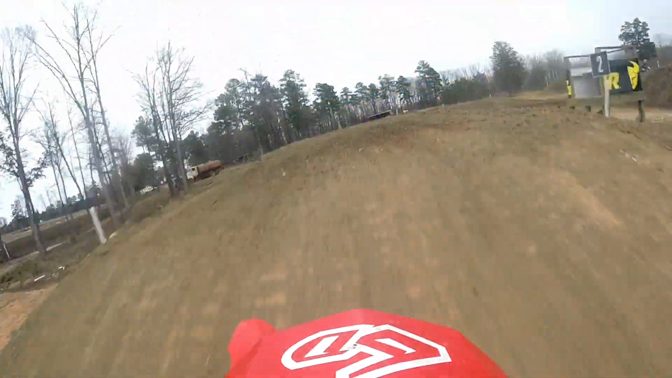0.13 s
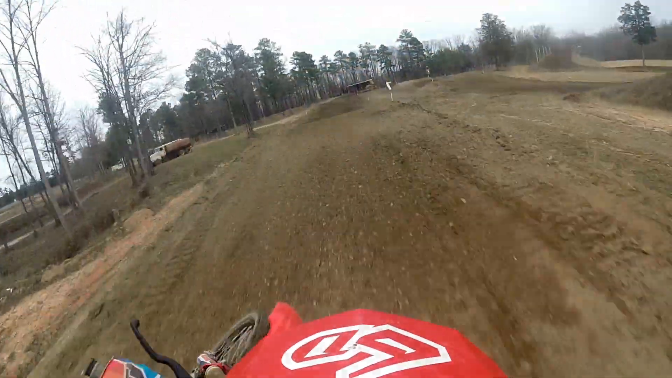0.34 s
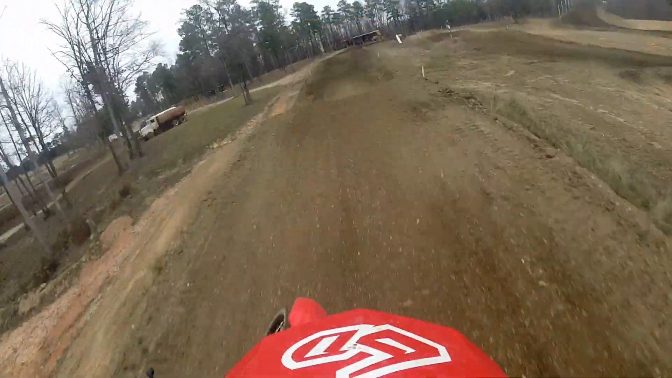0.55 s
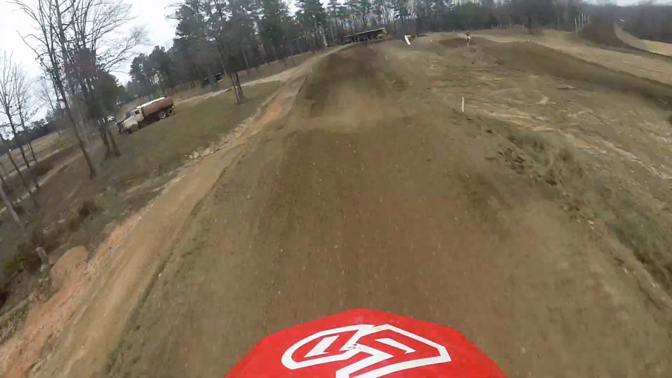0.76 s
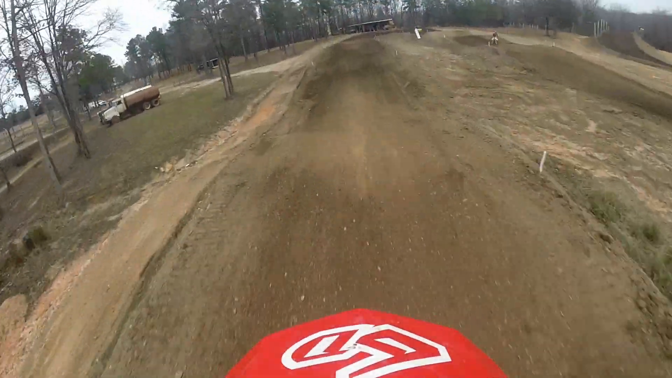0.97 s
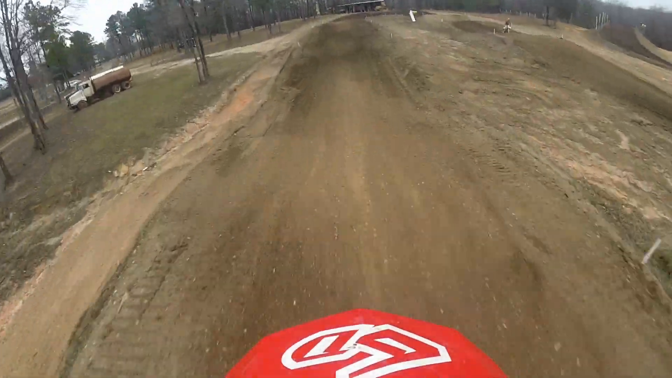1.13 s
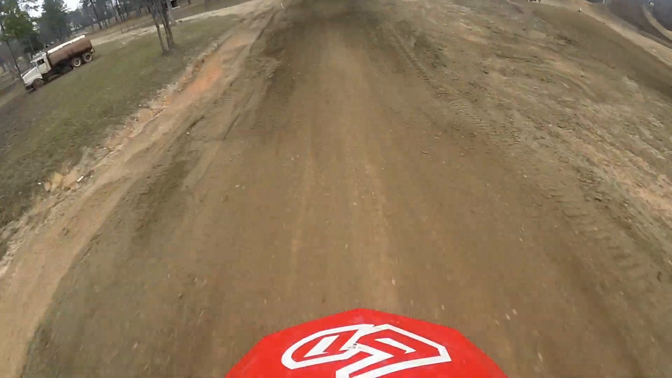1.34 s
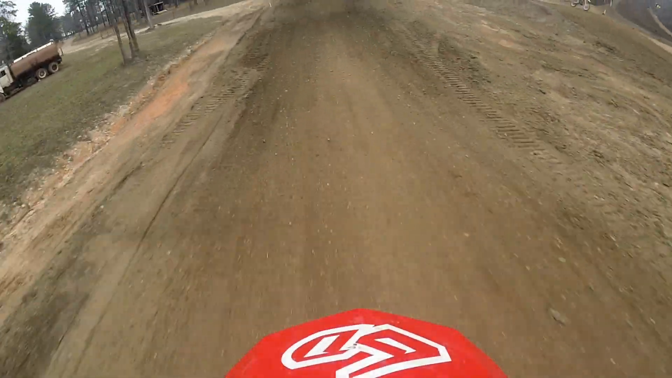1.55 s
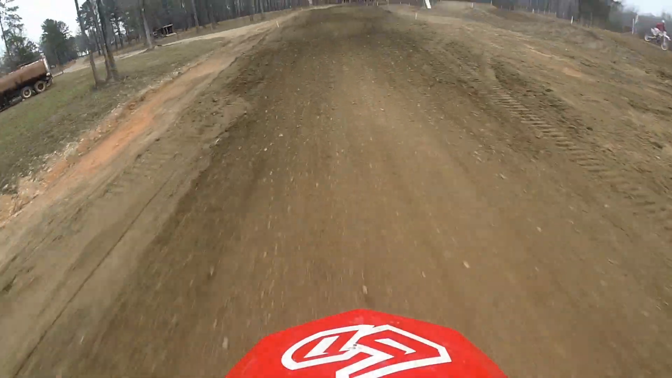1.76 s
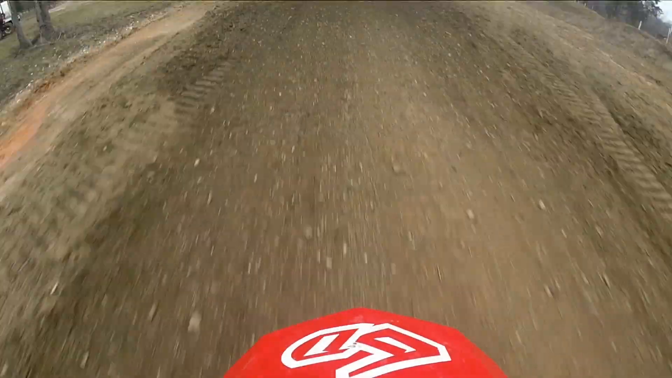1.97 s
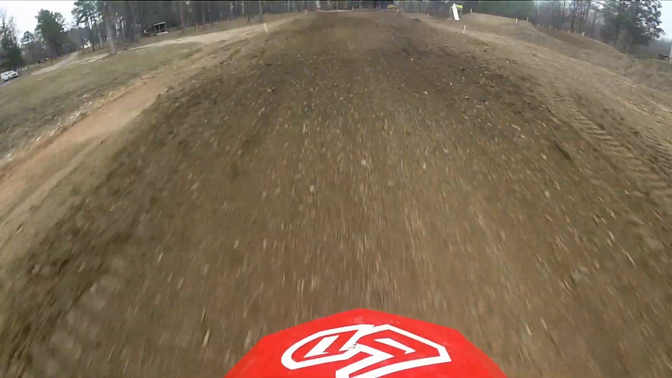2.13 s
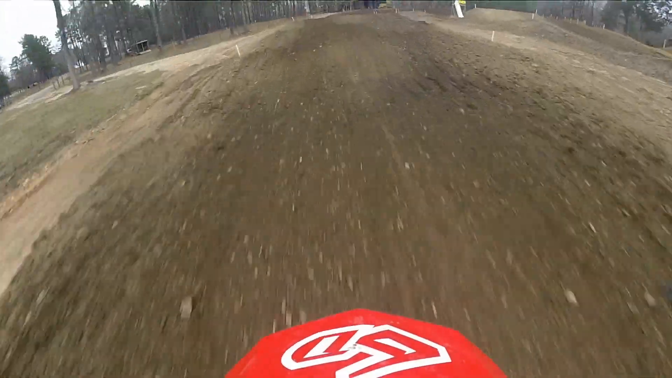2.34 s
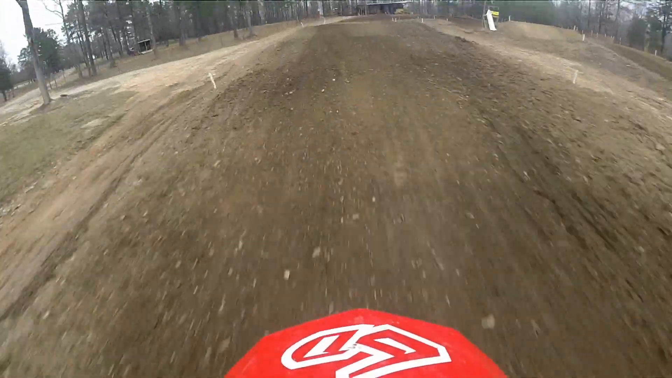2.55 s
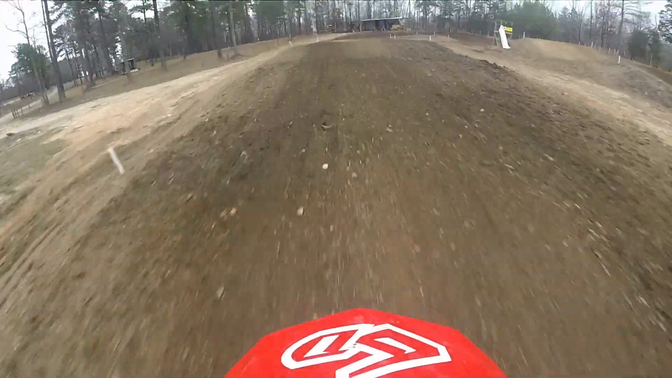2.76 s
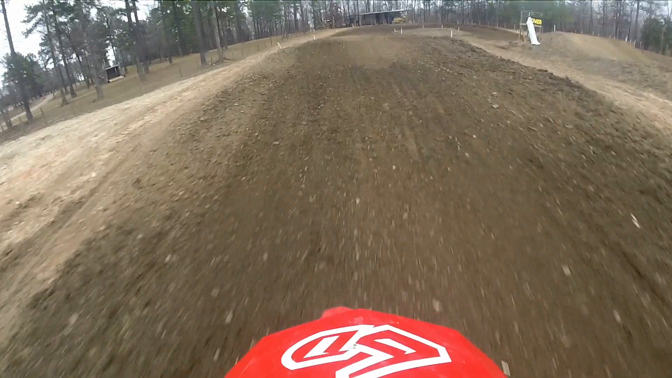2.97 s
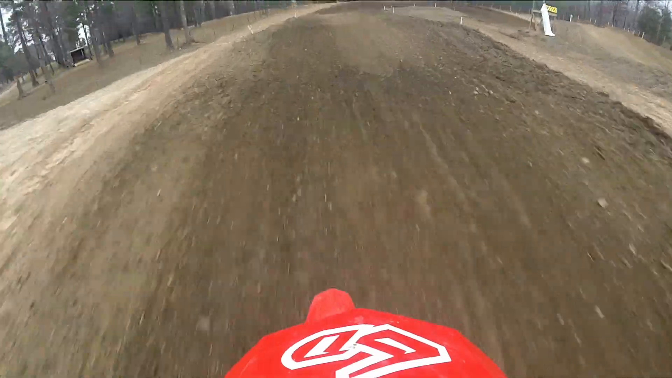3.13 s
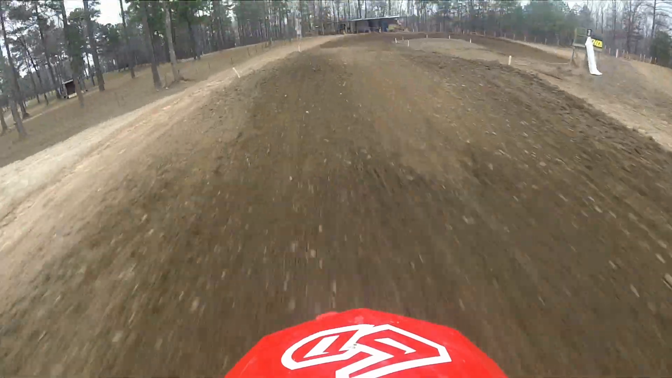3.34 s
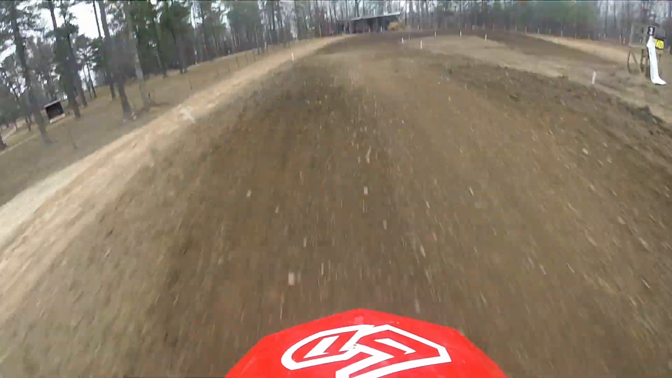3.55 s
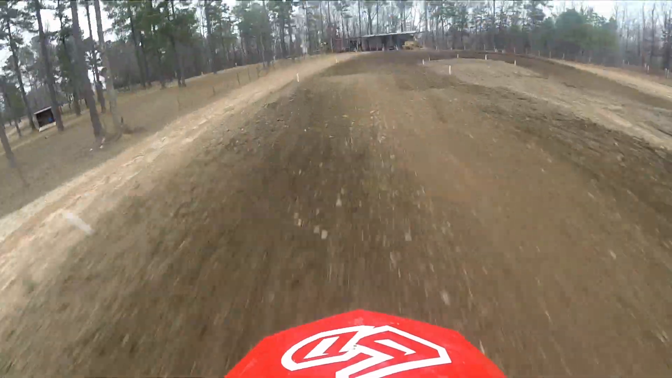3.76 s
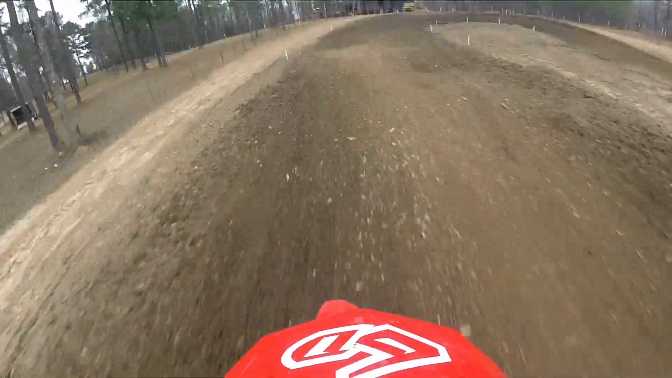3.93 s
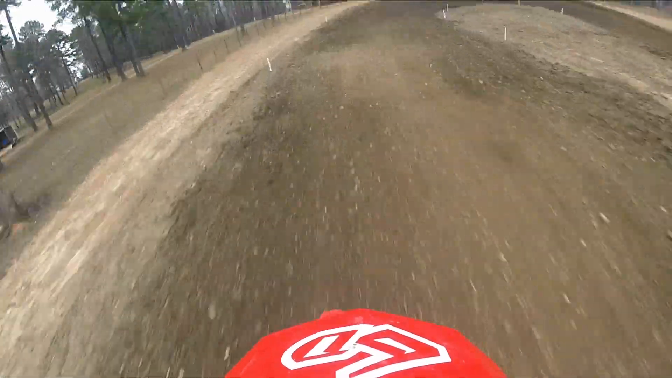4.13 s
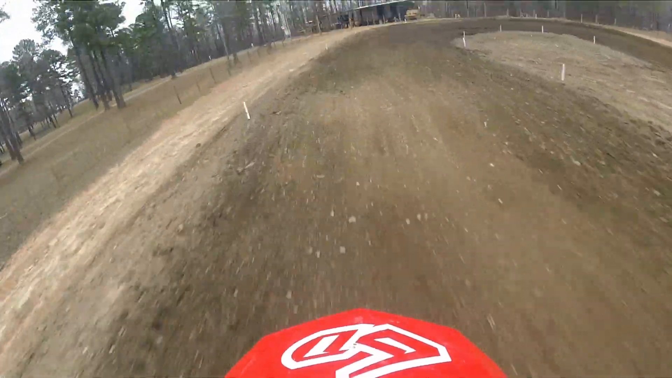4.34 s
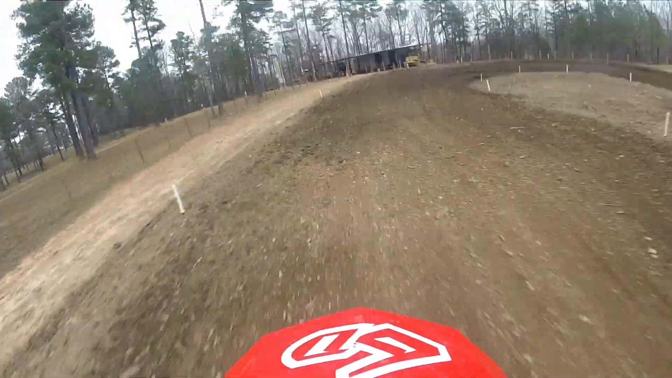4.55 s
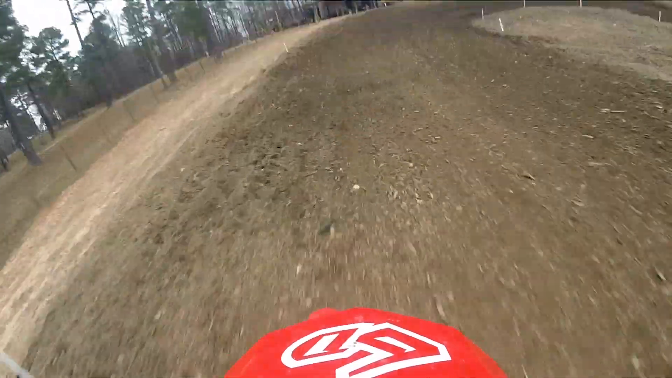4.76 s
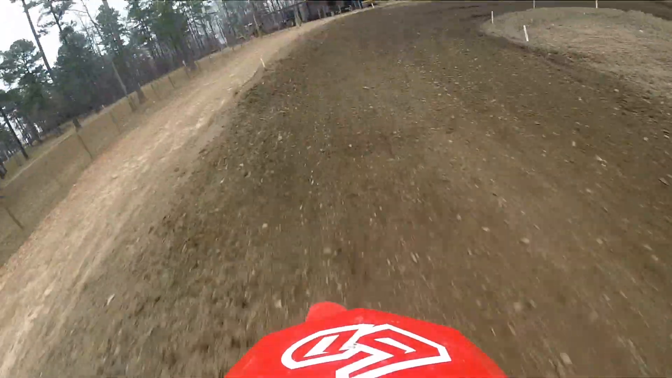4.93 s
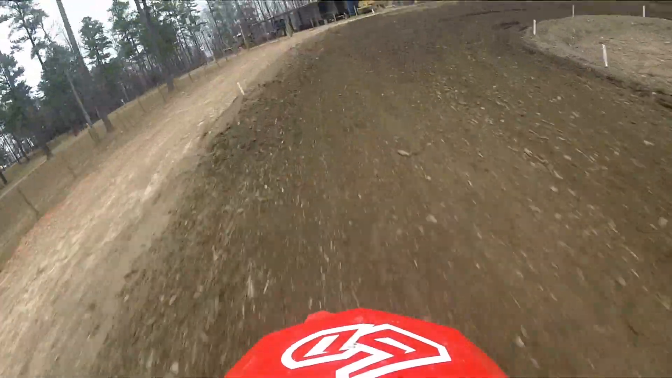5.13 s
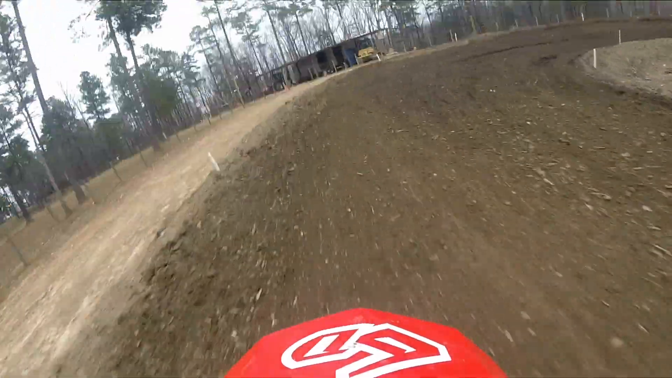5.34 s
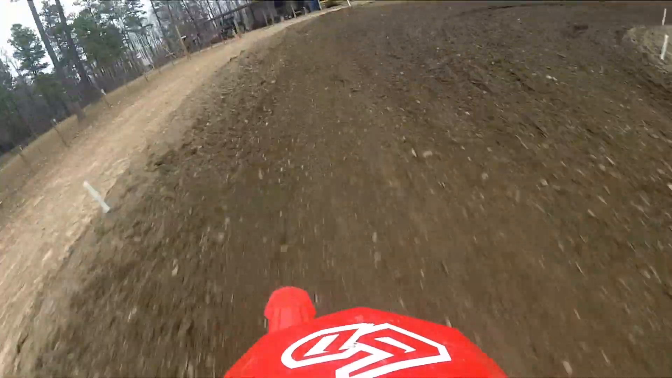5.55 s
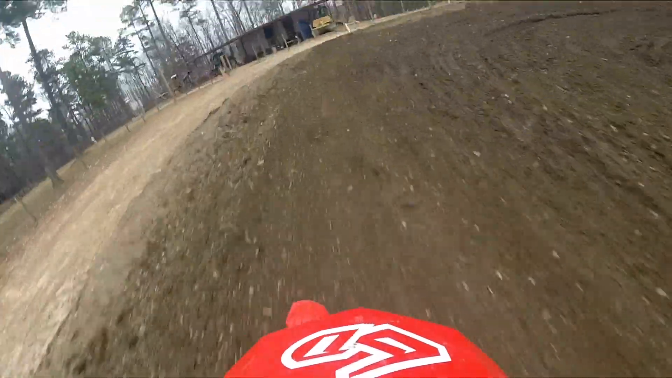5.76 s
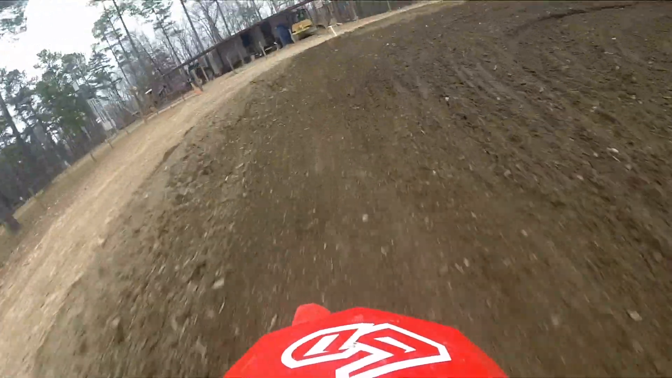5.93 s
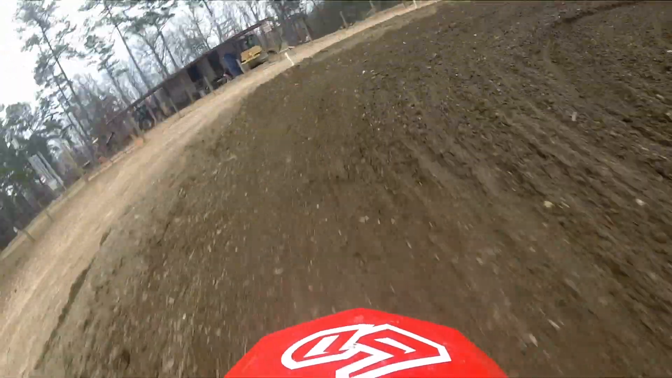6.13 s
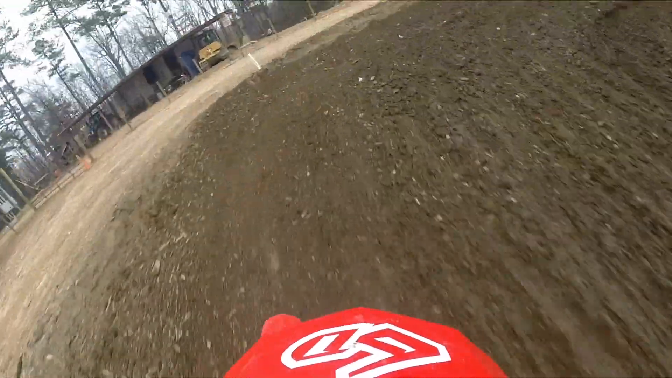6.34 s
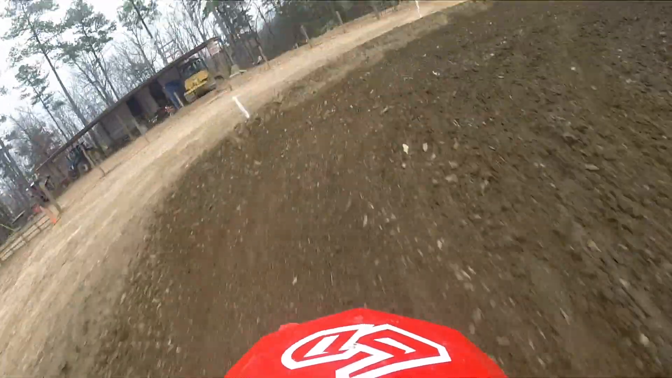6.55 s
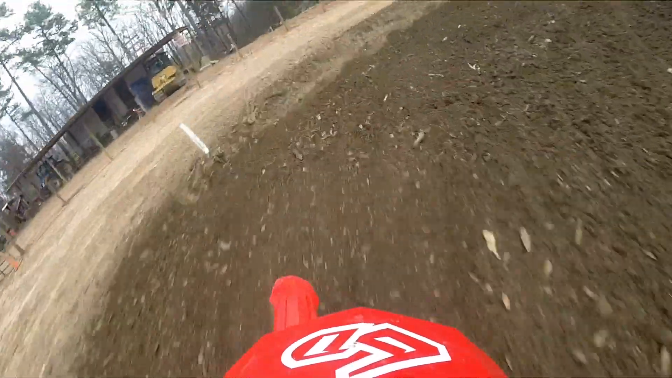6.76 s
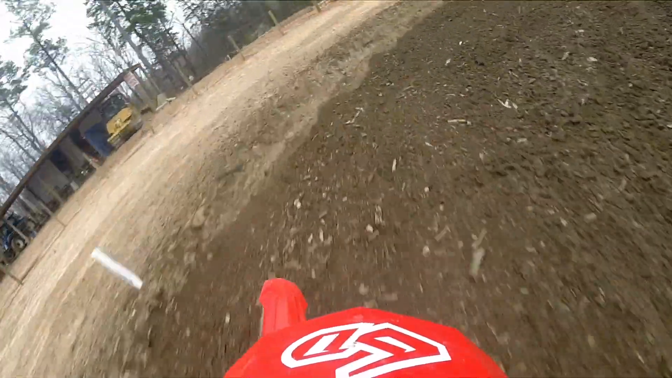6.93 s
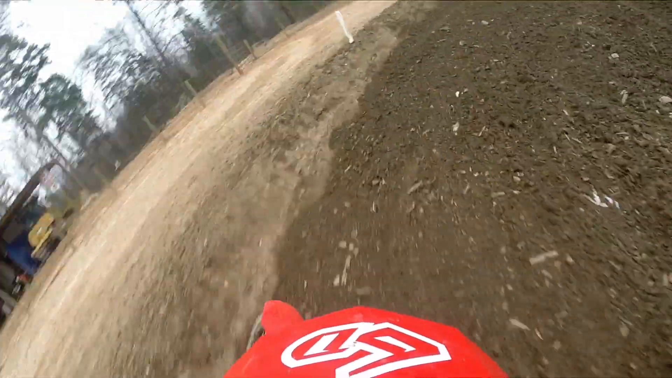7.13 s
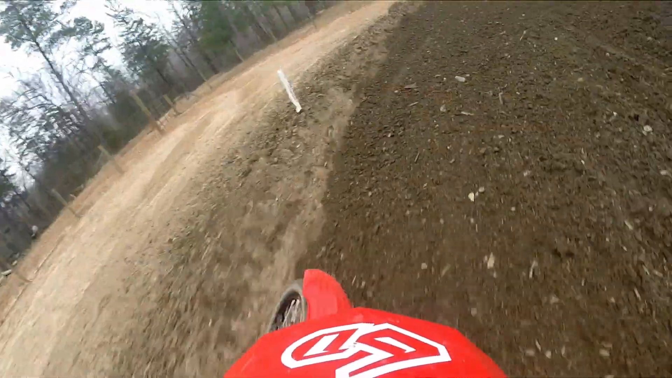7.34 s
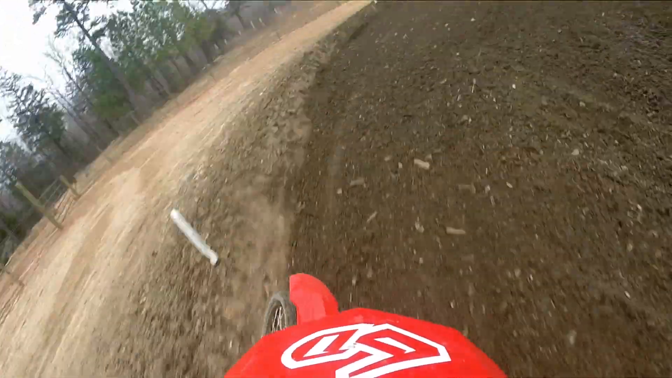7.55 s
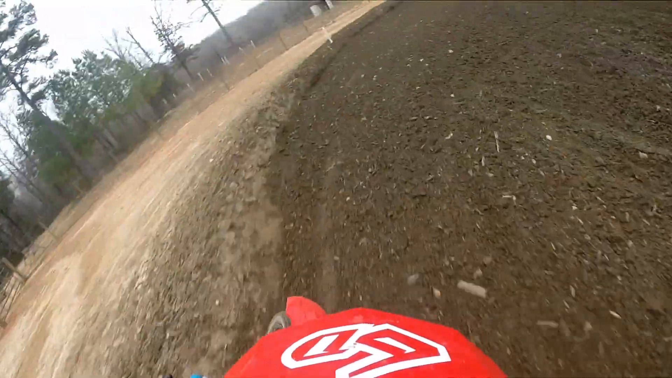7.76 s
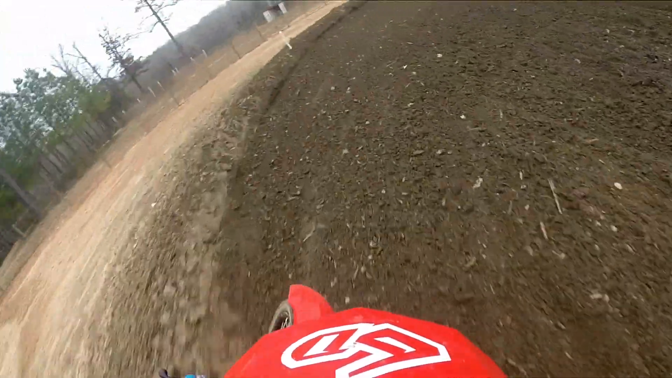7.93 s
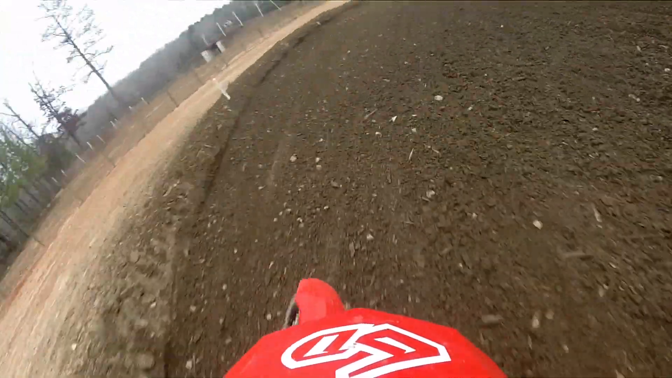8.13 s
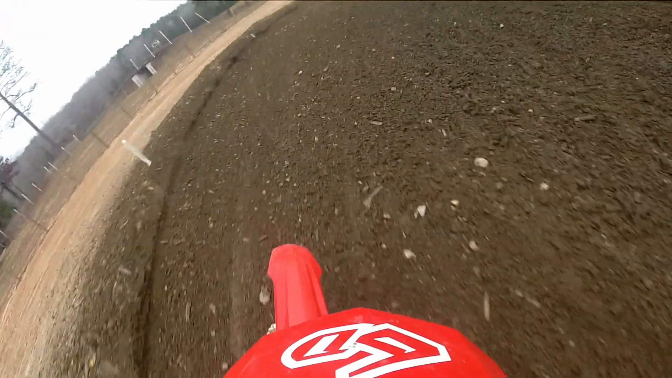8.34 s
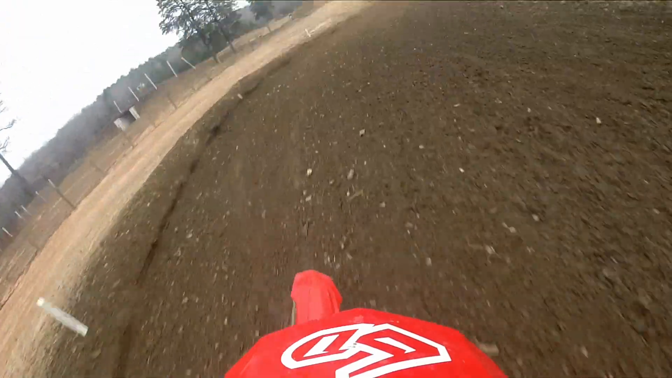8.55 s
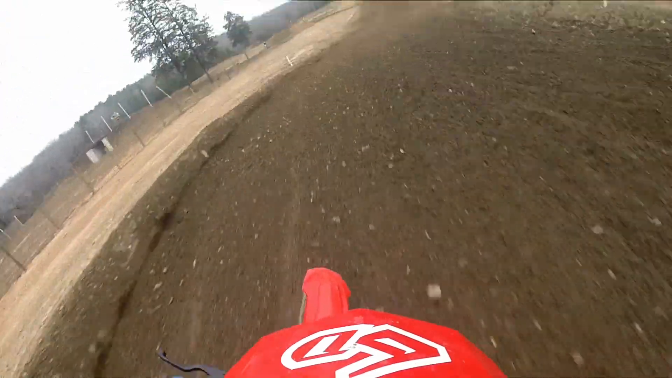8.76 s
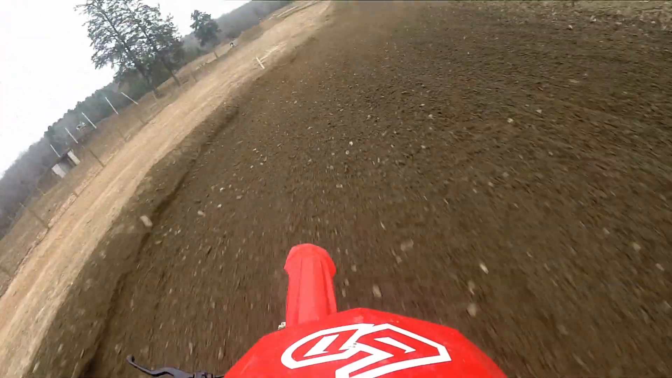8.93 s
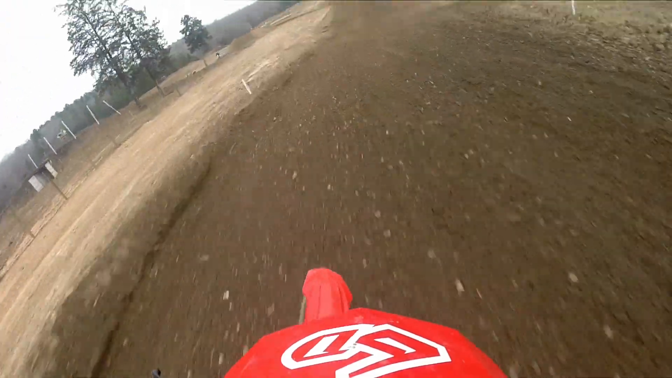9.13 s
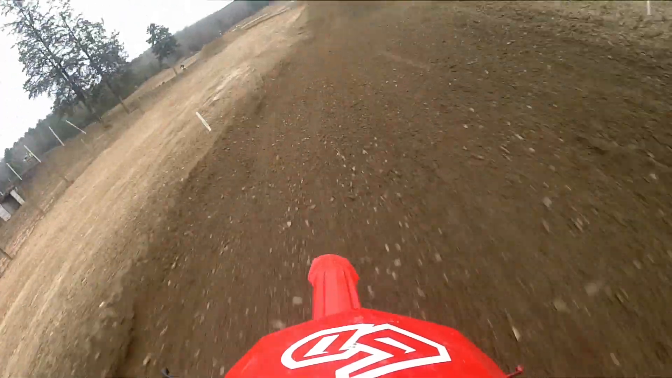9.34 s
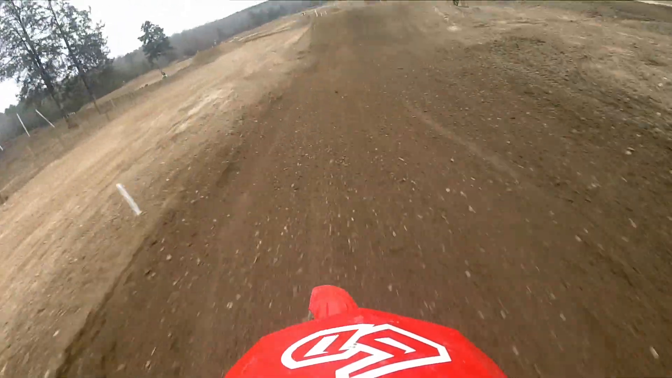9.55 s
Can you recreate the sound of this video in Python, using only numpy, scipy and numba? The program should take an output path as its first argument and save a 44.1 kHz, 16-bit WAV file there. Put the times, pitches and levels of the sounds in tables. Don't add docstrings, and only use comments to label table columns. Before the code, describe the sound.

Outdoors on a dirt track, one muffled helmet microphone catches wind hiss, low buffeting and a raspy motocross engine. First a coast, then a crackling blip and full-throttle surges with dull thumps. Next the revs fall in steps and the wind fades almost away; after brief coughing catches of the engine, separate deep firing beats boom out of the corner, quickening amid thumps and small stone ticks.

```python
import sys
import numpy as np
from scipy import signal
from scipy.fft import rfft, irfft, next_fast_len
from scipy.io import wavfile
from scipy.ndimage import uniform_filter1d
from numba import njit

SR = 44100
rng = np.random.default_rng(int(sys.argv[2]) if len(sys.argv) > 2 else 0)


def master_out(mix):
    frames = np.transpose(np.atleast_2d(mix))
    ceiling = np.clip(frames, -1, 1)
    pcm = np.round(ceiling * 32767).astype(np.int16)
    wavfile.write(sys.argv[1], SR, pcm)


def gain_from_db(level_db):
    decades = np.asarray(level_db, float) / 20
    return 10 ** decades


N = 427329
MIDDLE_HZ, FULL_DB = 50, -45


def columns(table):
    s, *rest = np.transpose(table)
    return [np.interp(np.arange(N) / SR, s, c) for c in rest]


def band_level(x, lo_hz, hi_hz):
    size = next_fast_len(N)
    hz = np.fft.rfftfreq(size, 1 / SR)
    power = 2 * np.sum(np.abs(rfft(x, size)[(hz > lo_hz) & (hz < hi_hz)]) ** 2)
    return x * np.sqrt(size * N / power)


def butter(x, order, hz, kind="low"):
    return signal.sosfilt(signal.butter(order, hz, kind, fs=SR, output="sos"), x)


def ring(x, modes):
    out = 0
    for k, (hz, width_hz, db) in enumerate(modes):
        b, a = signal.iirpeak(hz, hz / width_hz, SR)
        out = out + (-1) ** k * gain_from_db(db) * signal.lfilter(b, a, x)
    return out


def colour(x, spectrum, rings=()):
    size = next_fast_len(N)
    hz = np.fft.rfftfreq(size, 1 / SR) + 1
    points = np.array(spectrum)
    db = np.interp(np.log(hz), np.log(points[:, 0]), points[:, 1])
    db = db + sum(up / (1 + (2 * (hz - f) / width_hz) ** 2) for f, width_hz, up in rings)
    return irfft(rfft(x, size) * gain_from_db(db), size)[:N]


def clicks(seconds, sizes):
    place = np.clip(np.asarray(seconds) * SR, 0, N - 2)
    whole = place.astype(int)
    part = place - whole
    return np.bincount(whole, sizes * (1 - part), N) + np.bincount(whole + 1, sizes * part, N)


def walk(rate):
    k = int(SR / rate)
    held = np.repeat(rng.standard_normal(N // k + 1), k)
    return 1.3 * uniform_filter1d(uniform_filter1d(held, k), k)[:N]


# peak in s, swell in dB, rise in s, fall in s.
GUSTS = [(0, -0.5, .1, .3), (0.799, 4.5, 0.19, 0.11), (1.8, 4, 0.28, 0.26), (1.96, 2, 0.077, 0.067),
         (2.24, 2.5, 0.16, 0.18), (2.621, -1, 0.2, .15), (2.86, 5.5, 0.38, 0.17), (3.03, 0.5, .1, 0.15),
         (3.2, -2, .1, .12), (3.45, 5.5, 0.32, 0.16), (3.95, -2.5, .1, 0.13), (4.15, 0.5, 0.094, 0.23),
         (4.5, 9.5, 0.34, 0.46), (5.0, 2, 0.15, 0.12), (5.4, 7, 0.37, 0.23), (6.45, 7, 0.2, 0.35),
         (7.3, 10.5, 0.11, 0.16), (8.6, 5, 0.22, 0.21)]
# time in s, headwind in dB.
HEADWIND = [(0, -41.5), (1, -44.5), (1.9, -43), (2.06, -45.5), (2.5, -42.5), (3.95, -44), (4.8, -44.5),
            (5.35, -45.5), (5.75, -47.5), (6.2, -54), (6.7, -59.5), (6.98, -66), (7.5, -64), (8, -53.5),
            (9.69, -46.5)]
# time in s, level in dB.
BUFFET = [(0, -47), (4.2, -43), (4.9, -45), (5.6, -44.5), (8.8, -40.5), (9.3, -51), (9.69, -45)]
# time in s, thump peak in dB, helmet shake in dB.
BUMPS = [(0.0, -58, -32), (.77, -65, -38), (1.797, -33, -21), (2.273, -38, -38), (2.682, -48, -44),
         (2.919, -21.5, -32), (3.42, -60, -30), (3.79, -28, -21.5), (4.595, -37, -38), (5.39, -28, -24.5),
         (6.211, -48, -35), (6.631, -27, -42), (7.097, -28, -44), (8.175, -31, -36), (8.359, -21, -16.5),
         (8.522, -23, -25), (8.674, -25, -25.5), (8.96, -62, -35)]


def air():
    time = np.arange(N)[:, None] / SR
    s, swell_db, rise_s, fall_s = np.transpose(GUSTS)
    away = np.where(time < s, (s - time) / rise_s, (time - s) / fall_s)
    hiss_db = columns(HEADWIND)[0] + np.clip(1 - away, 0, 1) @ swell_db
    s, _, shake_db = np.transpose(BUMPS)
    shake_rise_s, shake_db_per_s = 0.06, 100
    rocking = np.clip((time - s) / shake_rise_s + 0.5, 0, 1) * gain_from_db(-shake_db_per_s * np.maximum(time - s, 0))
    buffet_db = 20 * np.log10(gain_from_db(columns(BUFFET)[0]) + rocking @ gain_from_db(shake_db))
    treble_db = 2 + 0.086 * (hiss_db - FULL_DB)
    return hiss_db, buffet_db, treble_db


# time in s, dB above 5 kHz, dB under 1.5 kHz.
HEAD_TURN = [(0, 0.5, -1), (.7, 1.5, -0.5), (1.4, 0, -1), (2.6, 2, 2), (3.0, 0.5, -0.5), (3.25, 3, 2.5),
             (3.5, 0, 0), (3.75, 3.5, 1.5), (4.0, 1.5, 0), (4.8, -1.5, -3), (5.1, 0, -1), (5.5, -2.5, -2),
             (5.6, -1.5, 0.5), (6.2, -1, -0.5), (6.7, -1.5, 3), (7.8, 0.5, 3.5), (9.0, 3, 2)]
# Hz, dB per Hz.
PORT_SPECTRUM = [(35, -24), (60, -2), (76, -12), (167, -10.5), (259, -11), (756, -18), (1870, -6.5),
                 (2100, -3), (2470, -0.5), (3580, -7.5), (4320, -18), (5450, -12.5), (6410, -29),
                 (12600, -39.5), (15500, -52)]
# Hz, width in Hz, dB.
PORT_RINGS = [(1402, 124, 7), (1710, 200, 5.5), (2090, 275, 6), (4940, 1000, -7), (5230, 100, 6),
              (7000, 125, 7)]
# Hz, width in Hz, dB.
MOUNT = [(47, 4.7, -3.5), (27.5, 15, -11.5)]


def wind():
    hiss_db, buffet_db, treble_db = air()
    whistle_db, body_db = columns(HEAD_TURN)
    flutter, fine = walk(8.1), walk(19)
    hiss = 0
    for hz in 90 * 2 ** np.arange(0, 7.5, 1.0):
        band = butter(rng.standard_normal(N), 2, [hz / np.sqrt(2), hz * np.sqrt(2)], "band")
        band_db = 1.35 * flutter + 0.5 * walk(25)
        if hz > 5000:
            band_db = band_db + treble_db + whistle_db + 0.5 * fine
        if hz < 1500:
            band_db = band_db + body_db
        hiss = hiss + band * gain_from_db(band_db)
    hiss = band_level(colour(hiss, PORT_SPECTRUM, PORT_RINGS), 2400, 4000)
    eddies = ring(rng.standard_normal(N) * gain_from_db(2.0 * walk(9.2)), MOUNT)
    eddies = band_level(butter(eddies, 4, 58), 12, 70)
    return gain_from_db(hiss_db - 0.5) * hiss + gain_from_db(buffet_db - 9.0) * eddies


# Hz, dB per Hz.
ROLL_SPECTRUM = [(150, -8), (500, -3), (1000, -3), (2000, -2), (4200, -2), (6000, -17), (12000, -43)]


def rolling():
    rustle = band_level(colour(rng.standard_normal(N), ROLL_SPECTRUM), 300, 6000)
    return gain_from_db(-67.5 + 3.5 * walk(12)) * rustle


def bumps():
    s, peak_db, _ = np.transpose(BUMPS)
    push = np.hanning(int(0.0295 * SR))
    pushed = signal.fftconvolve(clicks(s, -gain_from_db(peak_db)), push)[:N]
    return gain_from_db(2.0) * ring(pushed, [(49.6, 20, 0)]) + gain_from_db(-9.0) * ring(pushed, [(24.1, 22, 0)])


# start in s, firing rate in Hz, climb in s, peak rate in Hz,
# bend of the fall (1 even, under 1 early).
SURGES = [(-0.1, 66.5, 0.12, 68.4, 0.96), (.778, 41.24, 0.23, 65.4, 0.98), (1.3, 55.1, 0.47, 97.3, 1.5),
          (1.81, 63.5, 0.26, 67.7, 1.06), (2.14, 65.64, 0.068, 67.65, 1.11), (2.3, 67.1, 0.094, 68.1, 1.1),
          (2.44, 66, .09, 74.96, 1.03), (2.6, 76.48, 0.27, 88.2, 1.3), (2.979, 65.33, 0.15, 78.7, 0.95),
          (3.231, 74.34, 0.077, 76.1, 1), (3.47, 63.04, 0.22, 89.7, 1.3), (3.82, 56.06, 0.082, 55.65, 0.84),
          (4.462, 39.74, 0.25, 50.2, 1.05), (4.98, 36.4, .012, 36.2, .75), (5.33, 28.32, 0.11, 44.06, 1.2),
          (5.76, 30.7, .012, 30.54, .7), (6.22, 27.5, 0.195, 51.9, 0.96), (6.69, 35.3, .012, 35.2, .95),
          (7.09, 25.2, 0.18, 49.2, 0.91), (7.53, 25.1, 0.076, 36.8, 1.1), (7.642, 34.94, 0.26, 52.7, 0.75),
          (8.05, 35.37, 0.074, 36.53, 1.2), (8.2, 34.5, 0.091, 38.4, 1.17), (8.349, 33.5, 0.12, 41.2, 1.1),
          (8.54, 41.5, 0.062, 47, 1.17), (8.68, 40.5, 0.082, 47, 0.77), (8.83, 39.7, 0.092, 39.5, 1.06),
          (9.0, 39.43, 0.26, 55.4, 1.2), (9.295, 46.9, 0.061, 49.2, 0.83), (9.415, 46.6, 0.086, 54.8, 0.74),
          (9.56, 53.4, 0.16, 65.5, 0.65)]


def firing_rate():
    s, low_hz, climb_s, peak_hz, fall_bend = np.transpose(SURGES)
    climb_bend, ease = 0.93, 0.6
    knots, hz = np.ravel([s, s + climb_s], "F"), np.ravel([low_hz, peak_hz], "F")
    place = np.interp(np.arange(N) / SR, knots, np.arange(len(knots)) - 1e-9)
    k = place.astype(int)
    way = (place - k) ** np.ravel([climb_bend + 0 * s, fall_bend], "F")[k]
    way = ease * way ** 2 * (3 - 2 * way) + (1 - ease) * way
    return hz[k] + (hz[k + 1] - hz[k]) * way


BEATS = [0.847, .887, .922, 1.37, 1.387, 1.419, 1.463, 1.505, 1.542, 3.487, 3.531, 3.584, 3.633, 6.21,
         6.245, 6.342, 6.442, 6.505, 6.598, 6.682, 7.157, 7.186, 7.528, 7.568, 7.603, 7.66, 7.965, 8.045,
         8.128, 8.183, 8.24, 8.295, 8.349, 8.406, 8.458, 8.507, 8.558, 8.6, 8.65, 8.699, 8.746, 8.813,
         8.888, 8.989, 9.038, 9.105, 9.169, 9.208, 9.244, 9.285, 9.347, 9.41, 9.471, 9.527, 9.582, 9.667]


def engine_cycles(hz):
    time = np.arange(N) / SR
    cycles = np.cumsum(hz) / SR
    phase = np.unwrap(np.interp(BEATS, time, cycles) % 1, period=1)
    return cycles - uniform_filter1d(np.interp(time, BEATS, phase), size=SR // 25)


# start in s, held in s, silencer boom in dB, outlet crack in dB, low ring in dB.
THROTTLE = [(0.821, 0.085, -45, -34, 2.5), (1.336, 0.16, -54.5, -41, 8.5), (1.435, 0.094, -54, -35, 6.5),
            (1.525, 0.057, -65, -37.5, 0.5), (1.601, 0.13, -64, -44, -1.5), (1.765, 0.3, -45.5, -47, 0.5),
            (2.08, 0.076, -50, -48, 10), (2.17, 0.19, -45.5, -45.5, -0.5), (2.42, 0.072, -57, -50.5, -4),
            (2.52, .07, -72, -56, 0), (2.63, 0.17, -56, -48, 2), (2.92, 0.14, -47.5, -46, 1.5),
            (3.12, 0.18, -69, -51, 3.5), (3.44, .05, -41.5, -43, 0), (3.485, 0.075, -42, -41, -4),
            (3.555, 0.095, -55, -45, -6.5), (3.78, 0.057, -59, -58, -2), (4.69, 0.15, -58, -60.5, -5.5),
            (6.195, 0.046, -54.5, -65.5, -9), (6.27, .1, -61, -61, -5), (6.37, 0.12, -59, -58.5, -9),
            (6.515, .02, -57, -70, -4), (7.139, 0.074, -50, -69, 4), (7.225, 0.15, -57.5, -56, 12),
            (7.519, 0.17, -54.5, -95, 5), (7.75, 0.15, -45.5, -53, -3), (7.93, 0.68, -39, -46.5, -3),
            (8.438, 0.29, -37.5, -42, -1.5), (8.739, 0.38, -40.5, -44, 0), (8.938, 0.24, -38, -40, -1),
            (9.2, 0.3, -40.5, -41, -1.5), (9.16, 0.095, -42.5, -38.5, -5), (9.48, .4, -45, -41, -1.5)]
# start in s, length in s, frame drone in dB.
BRAKING = [
    (0.375, 0.6, -53.5),
    (1.049, .3, -68),
    (3.895, 0.82, -54),
    (4.896, 0.39, -54),
    (5.5, 0.36, -56.5),
    (5.78, 0.36, -61),
    (6.398, 0.33, -56.5),
    (6.681, 0.37, -63.5),
    (7.238, 0.29, -52.5),
]


def throttle(hz):
    s, held_s, boom, crack, low = np.transpose(THROTTLE)
    open_s, shut_s, bite_s, reopen_s = 0.026, 0.07, 0.11, 0.12
    time = np.arange(N)[:, None] / SR
    grip = np.clip(np.minimum((time - s) / open_s, 1 + (s + held_s - time) / shut_s), 0, 1)
    fresh = s - np.append(-1, (s + held_s)[:-1]) > reopen_s
    bite = grip * np.where(fresh, np.clip(0.5 + 0.5 * (time - s) / bite_s, 0, 1), 1)
    opened = np.minimum(grip.sum(axis=1), 1)
    shut = 1 - opened
    octaves = np.log2(hz / MIDDLE_HZ)

    overrun_boom, overrun_crack = gain_from_db(-63.5 + 9 * octaves), gain_from_db(-62.5 + 9 * octaves)
    boom_db = 20 * np.log10(np.max(grip * gain_from_db(boom), axis=1) + overrun_boom)
    crack_db = 20 * np.log10(np.max(bite * gain_from_db(crack), axis=1) + overrun_crack)
    push_db = crack_db - FULL_DB

    brake_s, length_s, brake_db = np.transpose(BRAKING)
    braking = np.sin(np.pi * np.clip((time - brake_s) / length_s, 0, 1)) @ gain_from_db(brake_db)
    drone_db = -65 + 4 * opened - octaves - 0.6 * np.maximum(boom_db - FULL_DB + 7, 0)
    drone_db = 20 * np.log10(gain_from_db(drone_db) + braking) + 5 * walk(5)

    howl_db = -51.5 + 0.82 * (boom_db - FULL_DB) - 0.22 * push_db + 4.5 * octaves - 3 * shut
    gas_db = opened * (-6 - 1.15 * push_db - 10 * octaves) + shut * (-4 - 18 * octaves)
    sizzle_db = np.clip(0.5 + 0.17 * push_db - 20.5 * octaves, -12, 12)
    lag_ms = uniform_filter1d(np.clip(6.32 + 2.5 * (push_db + 7.5), 0.7, 6.32), size=SR // 8)
    low_knots_s = np.ravel([s + open_s, s + held_s - open_s], "F")
    low_db = np.interp(time[:, 0], low_knots_s, np.repeat(low, 2))
    return boom_db, drone_db, howl_db, crack_db, low_db, gas_db, sizzle_db, lag_ms, opened


@njit
def sweep(x, hz, width_hz):
    y, b, l = np.empty(len(x)), 0., 0.
    for i in range(len(x)):
        g, k = np.tan(np.pi * hz[i] / SR), width_hz[i] / hz[i]
        v = (b + g * (x[i] - l)) / (1 + g * (g + k))
        b, l, y[i] = 2 * v - b, l + 2 * g * v, k * v
    return y


# time in s, harmonic of the firing rate.
HEADER = [(.7, 5), (.82, 6), (.96, 5), (1.3, 4), (1.71, 4), (1.75, 3), (1.78, 3), (1.82, 4), (3.72, 4),
          (3.8, 6), (6.2, 10), (6.4, 6), (7.1, 10), (7.3, 7), (7.6, 9), (7.86, 6), (8.05, 8), (8.2, 9),
          (8.4, 9), (8.45, 6), (9.42, 6), (9.5, 5)]
# time in s, harmonic of the firing rate, share in dB.
SECOND_MODE = [(8.12, 6, -32), (8.2, 6, -5), (8.38, 6, -4), (8.42, 9, -16), (8.46, 9, 1), (8.56, 9, -16),
               (8.8, 9, -4), (9.0, 9, -3.5), (9.1, 9, -14), (9.155, 9, -25), (9.165, 5, -14),
               (9.2, 5, -0.5), (9.27, 5, -2), (9.33, 5, -9), (9.45, 5, -9), (9.5, 4, -29), (9.69, 4, 1)]
# time in s, share against header in dB, upper chamber in dB.
CHAMBERS = [(1.3, -8, 6), (1.72, -8, -4), (1.8, 4, 10.5), (2.0, 7, 4.5), (2.12, -10, -6), (2.2, 0, 5.5),
            (2.9, 2, -5), (3.45, 5, 3.5), (6.2, 2, 6), (6.3, 0, 0), (7.1, 0, 1), (7.7, -2, 2),
            (7.95, 12, 0), (8.15, 1, -2), (8.28, 2, 3), (8.6, 0, 0), (8.85, 9.5, 0.5), (9.0, 2, 4),
            (9.1, -7, 3), (9.22, 1, -10), (9.35, -16, 14), (9.5, -7, 3), (9.69, -4, 2)]
# Hz, width in Hz, dB.
SILENCER = [(253.5, 40, 2), (299, 34, -0.5)]
# Hz, width in Hz, dB.
UPPER_CHAMBER = [(325.3, 24, 2), (364.3, 22, -5)]


def silencer(blast, hz, gas_db, opened):
    width_hz = 19.4 + 4 * np.clip(gas_db - 6, 0, 12)
    boom = sweep(blast, columns(HEADER)[0] * hz, width_hz)
    second, second_db = columns(SECOND_MODE)
    late_blast = np.roll(blast, int(1.52 * SR / 1000))
    boom = boom + gain_from_db(second_db) * sweep(late_blast, np.round(second) * hz, 18 + 0 * hz)
    share, upper = (gain_from_db(db) for db in columns(CHAMBERS))
    chambers = ring(blast, SILENCER) + upper * ring(blast, UPPER_CHAMBER)
    boom = band_level(boom, 240, 292) + share * band_level(chambers, 150, 550)
    boom = butter(boom / np.hypot(1, share), 4, [205, 410], "band")
    thump = band_level(butter(blast, 2, [220, 650], "band"), 200, 860)
    thump_db = -14 + 0.98 * np.clip(gas_db - 10, 0, 14)
    return band_level(boom, 210, 400) + opened * gain_from_db(thump_db) * thump


# Hz, width in Hz, dB.
FRAME = [(80, 35, -6), (167.8, 26, -2)]


def frame(turns):
    return band_level(ring(ring(turns, FRAME), [(123, 1700, 0)]), 80, 200)


# Hz, width in Hz, dB.
INTAKE = [(354, 294, 0.56), (612, 29, 1.3), (723, 140, -1.3)]


def intake(turns, gas_db):
    airy = gain_from_db(np.minimum(gas_db, 3))
    breath = airy * np.std(turns) * rng.standard_normal(N)
    howl = ring(ring((turns + breath) / np.hypot(1, airy), INTAKE), [(576, 270, 0)])
    return band_level(howl, 445, 749)


# Hz, delay in ms.
DISPERSAL = [(700, 0), (1300, 0.93), (1800, 1.46), (2200, 3.0), (2750, 4.5), (3600, 2.5), (5000, 1.2)]


def disperse(x):
    size = next_fast_len(N)
    hz = np.fft.rfftfreq(size, 1 / SR)
    lead_ms = 1.399
    late_s = np.interp(hz, *np.transpose(DISPERSAL)) / 1000 - lead_ms / 1000
    return irfft(rfft(x, size) * np.exp(-2j * np.pi * np.cumsum(late_s) * SR / size), size)[:N]


# Hz, width in Hz, dB.
OUTLET_LOW = [(940, 158, -2.5), (1079, 99, 8), (1492, 150, 3)]
# Hz, width in Hz, dB.
OUTLET_HIGH = [(1746, 73, 9), (2140, 181, 6), (2550, 140, 4), (2830, 750, -7), (4720, 120, -15)]
# Hz, width in Hz, dB.
BARK = [(1381, 36, -2.5)]
# Hz, dB per Hz.
GAS_SPECTRUM = [(350, -5), (600, -13), (953, -10), (1140, -13.5), (1560, 5), (1780, 1), (1930, 1.5),
                (2190, -2.5), (3200, -13), (5440, -24.5), (13200, -72), (15500, -69)]


def outlet(firing, low_db, gas_db, sizzle_db):
    pipe_echo = 0.88 * np.roll(firing, int(0.001951 * SR))
    ground_echo = 0.46 * np.roll(firing, int(0.0052 * SR))
    echoed = pipe_echo - firing + ground_echo
    late = np.roll(echoed, int(0.0004 * SR))
    crack = ring(echoed, OUTLET_LOW) + gain_from_db(1.8 * low_db) * ring(echoed, BARK)
    crack = band_level(crack - ring(late, OUTLET_HIGH) / gain_from_db(low_db), 1253, 1759)
    crack = butter(crack, 2, 5200)
    snap = band_level(butter(late, 2, [2400, 4000], "band"), 2000, 7900)
    crack = crack + gain_from_db(-16) * snap
    puff = signal.lfilter([1], [1, -np.exp(-1 / (0.0047 * SR))], np.abs(echoed))
    puff = puff + 0.03 * gain_from_db(1.5 * np.clip(gas_db, 0, 14))
    gas = colour(puff * rng.standard_normal(N), GAS_SPECTRUM, [(4590, 170, 10.0), (1535, 130, -22.5)])
    gas = band_level(gas, 820, 1640)
    sizzle = butter(gas, 2, 6500, "high")
    return disperse(crack + gain_from_db(gas_db) * gas + gain_from_db(sizzle_db) * sizzle) / np.hypot(1, gain_from_db(gas_db))


# multiple of the firing rate, dB.
CRANK = [(3, -1), (4, -23), (5, 4.5), (6, 5), (7, -2.5), (8, -1.5)]


def crank(cycles, hz, opened, push_db):
    octaves = np.log2(hz / MIDDLE_HZ)
    turn_db = -60 + 12.5 * octaves - 11.5 * (1 - opened)
    turn = gain_from_db(turn_db) * np.sin(4 * np.pi * cycles)
    song = sum(gain_from_db(db) * np.sin(2 * np.pi * round(k) * cycles + k * k) for k, db in CRANK)
    song_db = -78 + 26 * np.minimum(octaves, 0.75) + 0.39 * push_db + 1.5 * walk(9)
    return np.sqrt(2) * (turn + opened * gain_from_db(song_db) * song)


# Hz, width in Hz, dB.
CASE_DIP = [(449, 57, -6.5)]


def engine():
    hz = firing_rate()
    boom_db, drone_db, howl_db, crack_db, low_db, gas_db, sizzle_db, lag_ms, opened = throttle(hz)
    time = np.arange(N) / SR
    cycles = engine_cycles(hz)
    count = np.arange(int(cycles[-1]) + 1)
    jitter, strength = np.clip(rng.standard_normal((len(count), 2)).T, -1.6, 1.6)

    def strokes(at, scatter_db, late_s=0 * time):
        seconds = np.interp(count + at + 0.004 * jitter, cycles, time)
        seconds = seconds + np.interp(seconds, time, late_s)
        return clicks(seconds, gain_from_db(scatter_db * strength)) / np.sqrt(hz)

    firing = strokes(0, 0.9)
    blast = strokes(0, 1.2, lag_ms / 1000)
    idle_share = -0.27 + 0.19 * opened
    turns = strokes(0, 0.29) + idle_share * strokes(0.512, 0.74)

    low = gain_from_db(boom_db) * silencer(blast, hz, gas_db, opened)
    low = low + gain_from_db(drone_db) * frame(turns)
    low = low + gain_from_db(howl_db - 7.0) * intake(turns, gas_db)
    low = colour(low, [(20, 0), (20000, 0)], CASE_DIP)
    tones = crank(cycles, hz, opened, crack_db - FULL_DB)
    return low + tones + gain_from_db(crack_db - 3.0) * outlet(firing, low_db, gas_db, sizzle_db)


def bursts(table, low_hz, top_hz):
    s, peak_db = np.transpose(table)
    decay = np.exp(-1 / (0.0024 * SR))
    burst = signal.lfilter([1], [1, -decay], clicks(s, gain_from_db(peak_db - 3.5))) * rng.standard_normal(N)
    return butter(butter(burst, 2, low_hz, "high"), 2, top_hz)


# time in s, peak in dB.
POPS = [
    (0.8485, -29.5),
    (0.8689, -34),
    (0.8893, -26),
    (0.906, -28),
    (0.9233, -30),
    (0.9374, -34),
]


def pops():
    return bursts(POPS, low_hz=2800, top_hz=8200)


# time in s, peak in dB.
GRIT = [
    (6.2636, -52),
    (6.6706, -50),
    (8.0445, -47),
    (8.1832, -62),
    (8.2391, -51),
    (8.294, -40),
    (8.3544, -40),
    (8.4392, -42),
    (8.514, -56),
    (9.04, -46),
]


def grit():
    s, peak_db = np.transpose(GRIT)
    tick = rng.standard_normal(256) * np.exp(-np.arange(256) / (0.0016 * SR))
    tick = butter(tick, 1, [3000, 11000], "band")
    return gain_from_db(-3) * signal.fftconvolve(clicks(s, gain_from_db(peak_db)), tick)[:N]


# time in s, peak in dB.
RELIGHTS = [
    (7.1564, -47),
    (7.1864, -42),
    (7.5289, -50),
    (7.5684, -48),
    (7.603, -50),
    (7.632, -48),
    (7.66, -52),
]


def relights():
    return bursts(RELIGHTS, low_hz=700, top_hz=5100)


def scene():
    return (wind() + rolling() + bumps() + engine() + pops() + grit() + relights())[None]


def top_cut(x):
    return signal.sosfilt(signal.butter(12, 15740, fs=SR, output="sos"), x)


def record(dry):
    return top_cut(dry)


dry = scene()
out = record(dry)
master_out(out)
```